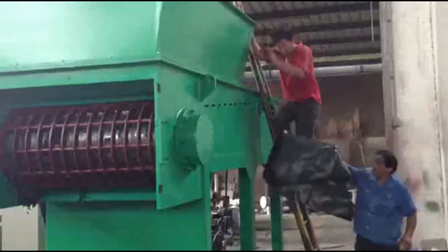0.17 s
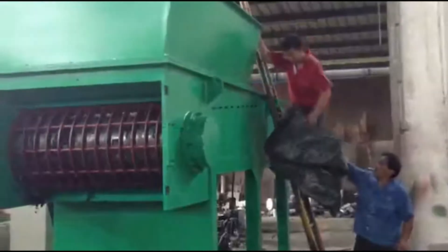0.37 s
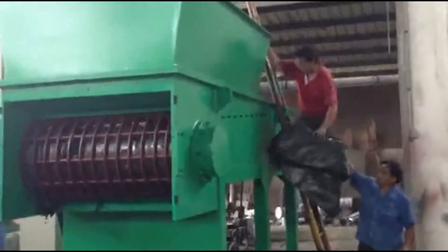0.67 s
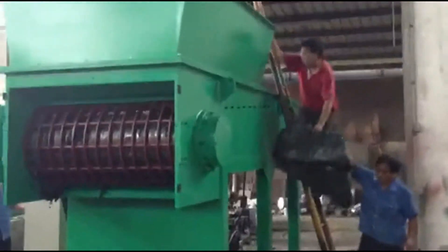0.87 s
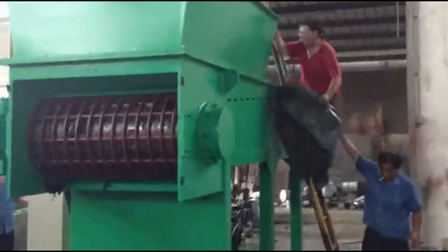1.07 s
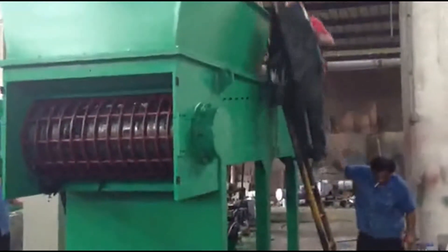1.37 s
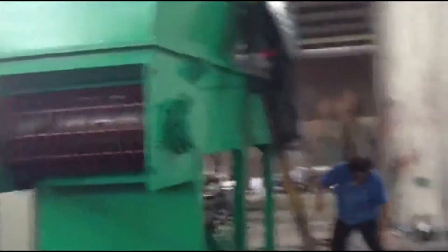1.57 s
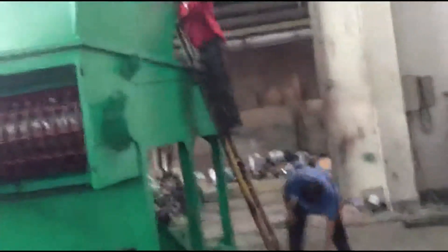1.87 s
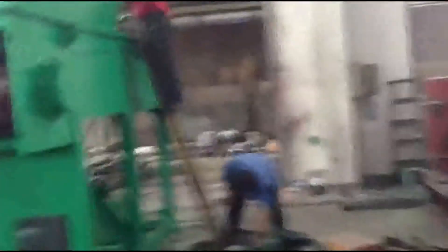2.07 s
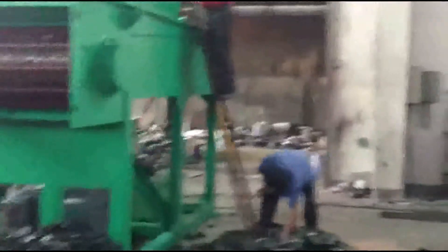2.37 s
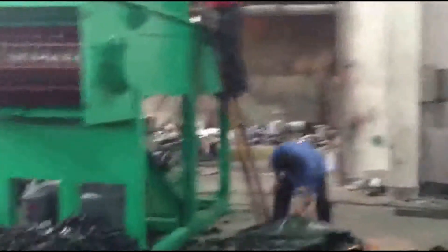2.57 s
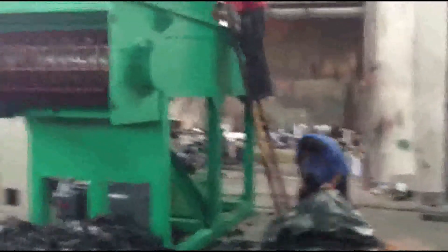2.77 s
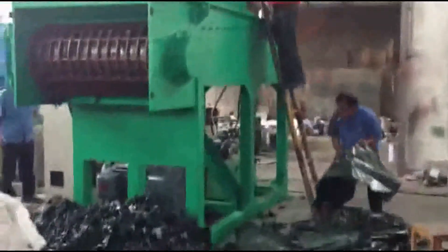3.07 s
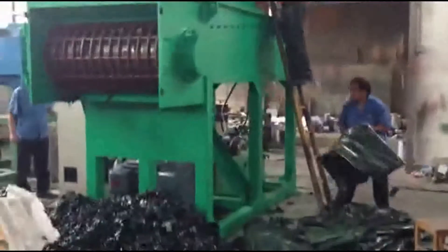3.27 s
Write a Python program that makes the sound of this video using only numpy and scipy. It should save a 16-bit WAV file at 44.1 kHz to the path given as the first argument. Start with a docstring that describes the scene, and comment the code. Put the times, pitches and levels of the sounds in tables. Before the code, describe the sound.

After 0.2 s of silence, a large shredder abruptly cuts in with a low tumbling roar, pulsing cutter hiss and rough gear whines in an echoing hall. Thuds and tears come at 0.3-0.85 s; plastic film crinkles sharply near 1.4 s and lightly at 1.9. Around 2.15 s the microphone swings: whines clear, hum and fizz grow. Heavy crunches, rips and short groans hit at 2.9 and 3.35-3.4 s.

```python
"""After a short silence the roar of a large shredder cuts in: plastic scraps tumbling in its steel chamber.
The roar and the cutters' hiss are random impacts and noise, filtered; thuds, tears and groans mark thick wads.
The drive whines on multiples of its shaft speed, and each whine wavers in level in the hall's standing waves.
A sheet of film rustles in showers of crinkles, over a soft fizz of flakes and a faint frame rumble.
Partway through, the microphone swings round: whines get cleaner and shift balance, fizz and rumble get louder."""
import sys
import numpy as np
from scipy import signal
from scipy.fft import rfft, irfft, next_fast_len
from scipy.io import wavfile
from scipy.ndimage import map_coordinates

SR = 44100
rng = np.random.default_rng(int(sys.argv[2]) if len(sys.argv) > 2 else 0)


def master(y):
    """Save y as 16-bit WAV."""
    cut = np.clip(np.atleast_2d(y).T, -1, 1)
    pcm = np.round(cut * 32767)  # scale
    wavfile.write(sys.argv[1], SR, pcm.astype(np.int16))


N = 151263  # length in samples

SHAFT_HZ, SPEED_DRIFT = 24.747, 0.000415  # average turns per second; drift as a fraction of that speed
TEETH = 13  # gear teeth passing per turn
TURN_S, TURN_LENGTH_S = 2.15, 0.26  # when the microphone swings round, and how gradual the change is


def amp(db):
    """Turn decibels into a multiplier."""
    return 10 ** (np.asarray(db) / 20)


def unit(x):
    """Scale a sound to an rms (average strength) of 1."""
    return x / np.sqrt(np.mean(x ** 2) + 1e-20)


def clock():
    """The time of every sample, in seconds."""
    return np.arange(N) / SR


def along(points, hz):
    """Read a value between (hz, value) points, on a logarithmic pitch axis."""
    point_hz, value = np.transpose(points)
    return np.interp(np.log(hz + 1), np.log(point_hz + 1), value)


def curves(rows):
    """Join the rows of a table with straight lines: one curve per column after the time."""
    time_s, *columns = np.transpose(rows)
    return [np.interp(clock(), time_s, column) for column in columns]


def wobble(rate):
    """A smooth random curve through `rate` random points a second."""
    points = rng.standard_normal(int(N * rate / SR) + 4)
    return map_coordinates(points, [clock() * rate])


def turned(before, after):
    """A value that glides from one setting to another as the microphone swings round."""
    progress = .5 + .5 * np.tanh((clock() - TURN_S) / TURN_LENGTH_S)
    return before + (after - before) * progress


def bump(s, half):
    """A smooth swell that peaks at 1 at time s."""
    return np.exp(-((clock() - s) / half) ** 2)


def swell(s, rise, t60):
    """An envelope that rises to 1 at time s, then falls by 60 dB in t60 seconds."""
    t = clock() - s
    rising = (np.minimum(t, 0) / rise) ** 2
    dying = np.log(1000) * np.maximum(t, 0) / t60
    return np.exp(-rising - dying)


def coloured(x, spectrum):
    """Filter x to the (hz, dB) points without smearing it ahead in time, at rms 1."""
    m = 2 * next_fast_len(N)
    # folding the cepstrum makes the filter minimum phase: it only rings after each impact
    cepstrum = irfft(np.log(amp(along(spectrum, np.fft.rfftfreq(m, 1 / SR)))))
    cepstrum[1:m // 2] *= 2
    cepstrum[m // 2 + 1:] = 0
    return unit(irfft(rfft(x, m) * np.exp(rfft(cepstrum)))[:N])


def grains(per_s, share, spread_db):
    """Random impacts of scattered size; share is their part of the power, the rest a smooth rush."""
    struck = rng.random(N) < per_s / SR
    sign = rng.choice([-1, 1], N)
    size = amp(spread_db * np.clip(rng.standard_normal(N), -2, 2))
    share = np.clip(share, 0, 1)
    return np.sqrt(share) * unit(struck * sign * size) + np.sqrt(1 - share) * rng.standard_normal(N)


# How loud the tumbling is before the hall is added: time_s, level_db
TUMBLING = [(.2, -23), (.32, -26.5), (.6, -27.5), (1.0, -28), (1.3, -29), (1.7, -28), (2.05, -28.5),
            (2.4, -29), (2.75, -30.5), (3.15, -26.5), (3.43, -29)]
# Tone colour of the chamber's roar: pitch_hz, relative_level_db
ROAR = [(25, -42), (60, -33.5), (92, -21), (122, -10.5), (160, -3), (195, -0.6), (255, -2.5), (300, -4.5),
        (350, -8), (420, -7.5), (490, -12), (630, -13), (1000, -19), (2000, -26.5), (5000, -49)]


def chamber():
    """Scraps knock about in the steel chamber: many impacts blend into a low roar."""
    tumbling_db, = curves(TUMBLING)
    level_db = tumbling_db + 1.6 * wobble(8.204)
    knocks = grains(240, share=0.33, spread_db=2.0)
    return amp(level_db) * coloured(knocks, ROAR)


# How hard the cutters work, before HISS_GAIN_DB and the hall are added: time_s, level_db
LOAD = [(.22, -39), (.48, -41), (.62, -36), (.76, -39), (.92, -38), (1.1, -39), (1.33, -38), (1.47, -35.5),
        (1.63, -38.5), (1.93, -38.5), (2.15, -40.5), (2.78, -39.5), (2.88, -37), (2.96, -43.5), (3.05, -40),
        (3.43, -39)]
# Tone colour of the cutters' hiss: pitch_hz, relative_level_db
HISS = [(200, -16.5), (500, -11), (750, 0.5), (1100, 1.5), (1700, 1.5), (2300, -0.5), (3500, 0),
        (4700, -1.5), (5600, -9), (7200, -9.5), (8300, -16), (10300, -17.5), (12500, -20), (14300, -23),
        (15600, -32)]
HISS_GAIN_DB = 3.5  # added to both tears and rattle
RATTLE_DB = -9.5  # relative to the average load
PULSING = 0.24  # overall depth of the pulses, before their weights


def cutters(turns):
    """Tiny tears, pulsing with shaft and teeth, over a rattle that repeats each turn."""
    load_db, = curves(LOAD)
    weights = [(1, .6), (2, .5), (4, .6), (TEETH, .35)]  # (pulses per turn, weight)
    pulse = 1 + PULSING * sum(np.cos(2 * np.pi * k * turns) * weight for k, weight in weights)
    tears = coloured(pulse * grains(1500, share=0.22, spread_db=6.5), HISS)
    size = int(SR / SHAFT_HZ)  # one turn of noise, read round and round
    one_turn = rng.standard_normal(size)
    rattle = coloured(map_coordinates(one_turn, [turns % 1 * size], mode="grid-wrap"), HISS)
    tearing = amp(load_db + 1.4 * wobble(25.09)) * tears
    rattling = amp(load_db.mean() + RATTLE_DB) * rattle
    return amp(HISS_GAIN_DB) * (tearing + rattling)


# Hard bites on thick wads: peak_s, boom_level_db, boom_pitch_hz, rise_s, decay_60db_s, crunch_over_boom_db
BITES = [(.315, -21.5, 210, 0.006, 0.11, -11), (.435, -22, 180, 0.0061, .14, -3),
         (.457, -25, 254, .006, 0.14, -3.5), (.571, -26, 167.5, 0.014, .13, -10),
         (.834, -24.5, 207, .011, 0.16, -19), (1.26, -29, 258, .025, 0.18, -3),
         (2.08, -26.5, 251, 0.0085, 0.22, -13), (2.883, -25, 352, 0.0078, .1, -3),
         (2.912, -21, 277, 0.0073, 0.14, -4), (2.924, -23, 366, .008, .1, -5),
         (2.951, -19, 282, 0.011, .15, -13), (2.98, -22.5, 279, 0.0044, 0.094, -14),
         (3.352, -15.5, 181.6, 0.0062, 0.13, -14), (3.396, -18, 190, .016, 0.063, -5.5)]
# Tone colour of the crunch: pitch_hz, relative_level_db
CRUNCH = [(30, -29), (90, -24), (150, 2), (250, 3), (400, -1.5), (700, -2), (1000, -22), (2000, -23),
          (6000, -42)]
BOOM_JITTER, BOOM_WAVERS_PER_S = .12, 34  # phase waver in radians; random points per second


def bites():
    """A thick wad crunches between the knives and makes the hopper boom."""
    out = np.zeros(N)
    for s, db, hz, rise, t60, crunch_db in BITES:
        waver = BOOM_JITTER * wobble(BOOM_WAVERS_PER_S)
        boom = unit(np.sin(2 * np.pi * hz * (clock() - s) + waver))
        crunch = coloured(grains(600, share=0.36, spread_db=2.5), CRUNCH)
        out += amp(db) * swell(s, rise, t60) * (boom + amp(crunch_db) * crunch)
    return out


# Long tears through the film: peak_s, level_db, centre_hz, rise_s, decay_60db_s
RIPS = [(.46, -38.5, 480, 0.085, .6), (.56, -37.5, 750, 0.15, 0.41), (.64, -39, 2880, 0.061, 0.84),
        (2.875, -35, 1860, 0.053, 0.42), (2.935, -29.5, 675, 0.044, 0.47), (3.372, -32.5, 2360, 0.021, 0.7),
        (3.39, -29, 428, 0.023, .7)]
# Tone colour of a tear: multiple_of_centre, relative_level_db
RIP_BAND = [(.05, -20), (.3, -11), (.6, 3), (1, 4.5), (1.5, 0.5), (2.2, -13.5), (6, -52)]


def rips():
    """The knives tear through a long fold: a dense burst of snaps."""
    out = np.zeros(N)
    for s, db, centre_hz, rise, t60 in RIPS:
        band = [(centre_hz * ratio, band_db) for ratio, band_db in RIP_BAND]
        tearing = coloured(grains(2500, share=0.2, spread_db=5), band)
        out += amp(db) * swell(s, rise, t60) * tearing
    return out


# Groans of film on steel: peak_s, level_db, pitch_hz (at the peak), wavers_per_s, glide_hz_per_s, half_length_s
GROANS = [(.95, -47, 1645, 50, 0, .3), (1.48, -45, 1650, 70, 0, .08), (2.14, -47, 1700, 90, -300, .1),
          (2.47, -44, 1660, 120, 0, .22), (2.885, -37, 870, 70, 0, .016),
          (2.926, -33.5, 530, 90, 1000, .014), (2.955, -30.5, 615, 75, 1500, .024),
          (2.997, -38, 665, 80, 1200, .018)]


def groans():
    """Film drags over steel: a tone wavers fast in level and phase, and may slide up or down."""
    out = np.zeros(N)
    for s, db, hz, waver_rate, glide, half in GROANS:
        t = clock() - s
        phase = 2 * np.pi * (hz * t + glide * t ** 2 / 2)
        groan = amp(1.6 * wobble(waver_rate)) * np.sin(phase + wobble(waver_rate))
        out += amp(db) * bump(s, half) * unit(groan)
    return out


# Each whine's roughness before and after the microphone swings round, and its slow level wander
FLUTTER_BEFORE_DB, FLUTTER_AFTER_DB, WANDER_DB = 2.6, 1.6, .6
JITTER_BEFORE, JITTER_AFTER = .45, .12  # fast phase jitter in radians


def tone(cycles):
    """A machine tone at rms 1: rough, then cleaner, its level wandering in the standing waves."""
    wander_db = WANDER_DB * wobble(2.1)
    flutter_db = turned(FLUTTER_BEFORE_DB, FLUTTER_AFTER_DB) * wobble(17)
    phase = 2 * np.pi * (cycles + rng.random())
    jitter = 0.37 * wobble(7.8) + turned(JITTER_BEFORE, JITTER_AFTER) * wobble(90)
    return unit(amp(wander_db + flutter_db) * np.sin(phase + jitter))


# Gear whine, levels before flares: multiple_of_tooth_rate, level_before_turn_db, level_after_turn_db
MESH = [(2, -48, -46), (3, -56, -51), (4, -57, -56), (6, -50, -54), (9, -56, -56), (10, -55, -53),
        (11, -57, -54.5), (12, -51.5, -52.5), (13, -47.5, -53), (14, -52, -52), (15, -57, -56),
        (16, -56, -50)]
# Its upper overtones: pitch_hz, level_db
MESH_TOP = [(5400, -57), (7000, -64), (9000, -100), (12000, -73), (15000, -77)]
# Other drive tones, levels before flares: multiple_of_shaft_speed, level_before_turn_db, level_after_turn_db
WHINES = [(40, -52, -50), (51, -50, -46), (66, -52, -54), (132, -55, -58), (141, -56, -57), (147, -52, -57),
          (154, -55, -55), (192, -53, -58), (195, -57, -60)]
# Single whines flare up: peak_s, multiple_of_shaft_speed, half_length_s, gain_db
FLARES = [(.63, 78, .06, 7), (.85, 147, .06, 9), (1.23, 78, .07, 5), (1.5, 78, .06, 6), (1.75, 78, .05, 7),
          (1.78, 156, .1, 6), (1.95, 78, .08, 11), (2.04, 182, .08, 10), (2.1, 130, .1, 15),
          (2.27, 156, .05, 8), (2.39, 156, .04, 7), (2.44, 169, .06, 6), (2.29, 40, .07, 9),
          (2.48, 40, .06, 11), (2.55, 130, .045, 9), (2.98, 130, .04, 7), (2.63, 182, .07, 8.5),
          (2.67, 51, .07, 7), (2.83, 182, .1, 8), (3.07, 182, .05, 7.5), (3.3, 182, .06, 7)]


def drive(turns):
    """Gear overtones and shaft tones, all locked to the turning shaft."""
    def whine(order, before_db, after_db):
        flare_db = sum(db * bump(s, half) for s, k, half, db in FLARES if k == order)
        return amp(turned(before_db, after_db) + flare_db) * tone(order * turns)

    gear = sum(whine(k * TEETH, before_db, after_db) for k, before_db, after_db in MESH)
    top = np.zeros(N)
    for k in range(17, 47):
        top += amp(along(MESH_TOP, k * TEETH * SHAFT_HZ)) * tone(k * TEETH * turns)
    shaft = sum(whine(k, before_db, after_db) for k, before_db, after_db in WHINES)
    return gear + top + shaft


# The two low tones, levels before their slight waver: time_s, hum_level_db, tooth_tone_level_db
DRONE = [(.2, -43, -38), (1.0, -40.5, -41), (1.62, -40, -42), (1.76, -41, -31), (1.84, -42, -33.5),
         (2.27, -34, -30), (2.47, -34.5, -33), (2.88, -33.5, -29.5), (3.04, -35, -37), (3.33, -34.5, -30),
         (3.41, -35, -42)]
HUM_HZ = 136.9
DRONE_WAVER_DB, DRONE_JITTER = .3, .08  # level waver of both tones; phase waver of the hum in radians


def drone(turns):
    """The housing's low hum, and the gear teeth's own rate heard as a pitch."""
    hum_db, tooth_db = curves(DRONE)
    hum_level = amp(hum_db + DRONE_WAVER_DB * wobble(6.4))
    hum = unit(np.sin(2 * np.pi * HUM_HZ * clock() + DRONE_JITTER * wobble(6.4)))
    tooth_level = amp(tooth_db + DRONE_WAVER_DB * wobble(9.65))
    tooth = unit(np.sin(2 * np.pi * TEETH * turns))
    return hum_level * hum + tooth_level * tooth


# Film rustles: peak_s, level_db, rise_s, decay_60db_s, snaps_over_rustle_db
RUSTLES = [(.56, -40, 0.035, 0.32, -12), (1.317, -48, .003, .08, 4), (1.395, -28.5, 0.0066, 0.15, -13),
           (1.44, -42, .02, 0.41, -14), (1.485, -44, .03, .45, -6), (1.538, -42, .014, .14, -2),
           (1.83, -42, .019, 0.13, -4), (1.903, -38.5, 0.011, 0.14, -5), (2.87, -43, .04, 0.22, -10),
           (3.07, -42, 0.077, .43, -12)]
# Tone colour of the crinkles: pitch_hz, relative_level_db
FILM = [(500, -25), (2000, -2.5), (4200, 6.5), (6000, -5.5), (9500, -5.5), (12000, -17), (15500, -25)]
# Tone colour of the bright snaps: pitch_hz, relative_level_db
SNAPS = [(2000, -20), (6000, 9), (9000, -3), (13000, 1), (15500, -6)]


def film():
    """A sheet is hauled up: each tug lets go a shower of crinkles and bright snaps."""
    tugs, snaps = np.zeros(N), np.zeros(N)
    for s, db, rise, t60, snap_db in RUSTLES:
        shape = swell(s, rise, t60)
        tugs += amp(db) * shape
        snaps += amp(db + snap_db) * shape
    crinkling = coloured(grains(900, share=.6, spread_db=4), FILM)
    snapping = coloured(grains(1200, share=0.4, spread_db=3), SNAPS)
    return tugs * crinkling + snaps * snapping


# Tone colour of the fizz: pitch_hz, relative_level_db
FIZZ = [(1000, -35), (4000, -1), (6800, 6.5), (8500, -1), (14000, -8), (15600, -10)]
FIZZ_BEFORE_DB, FIZZ_AFTER_DB = -57.5, -50.5  # middle level before and after the microphone swings round


def flakes():
    """Shredded flakes slide over the screen drum: dense tiny impacts make a high fizz."""
    level_db = turned(FIZZ_BEFORE_DB, FIZZ_AFTER_DB) + 0.86 * wobble(14)
    return amp(level_db) * coloured(grains(2500, share=0.31, spread_db=2), FIZZ)


# Tone colour of the rumble: pitch_hz, relative_level_db
RUMBLE = [(15, -6), (45, -1), (80, 10), (130, -17), (500, -62)]
RUMBLE_BEFORE_DB, RUMBLE_AFTER_DB = -72.5, -58.5  # middle level before and after the microphone swings round
RUMBLE_SWING_DB = 9.5  # size of the random lumps


def rumble():
    """The frame's faint rumble: low noise whose level swings at random."""
    level_db = turned(RUMBLE_BEFORE_DB, RUMBLE_AFTER_DB) + RUMBLE_SWING_DB * wobble(22.6)
    return amp(level_db) * coloured(rng.standard_normal(N), RUMBLE)


HALL_T60_S, HALL_WET = 0.75, 0.37  # time for the echo to fall 60 dB; echo's share of the power


def hall(x):
    """Direct sound plus the hall's echo, a dying tail of noise."""
    t = clock()[:SR]
    tail = rng.standard_normal(SR) * np.exp(-np.log(1000) * t / HALL_T60_S)
    echo = signal.fftconvolve(x, tail / np.linalg.norm(tail))[:N]
    wet = np.clip(HALL_WET, 0, 1)
    return np.sqrt(1 - wet) * x + np.sqrt(wet) * echo


def scene():
    """One slightly drifting shaft speed ties the cutters, whines and tooth tone together."""
    turns = np.cumsum(SHAFT_HZ * (1 + SPEED_DRIFT * wobble(2.045))) / SR
    machine = hall(chamber() + cutters(turns)) + drive(turns) + drone(turns) + rumble() + flakes()
    return (machine + bites() + groans() + rips() + film())[None]


START_S, START_RAMP_S = 0.2012, 0.011  # silence until the start, then a quick ramp
FADE_DB, FADE_S = -8, 0.075  # level offset at the start, and the time constant of its recovery
TOP_HZ = 15700  # nothing is kept from here up


def record(dry):
    """The sound cuts in, comes up to level and keeps nothing above the band limit."""
    t = clock() - START_S
    ramp = np.clip(t / START_RAMP_S, 0, 1)
    recovery = amp(FADE_DB * np.exp(-np.maximum(t, 0) / FADE_S))
    m = next_fast_len(N + SR // 2)
    keep = np.fft.rfftfreq(m, 1 / SR) < TOP_HZ
    return irfft(rfft(dry * ramp * recovery, m) * keep, m)[..., :N]


dry = scene()
out = record(dry)
master(out)
```